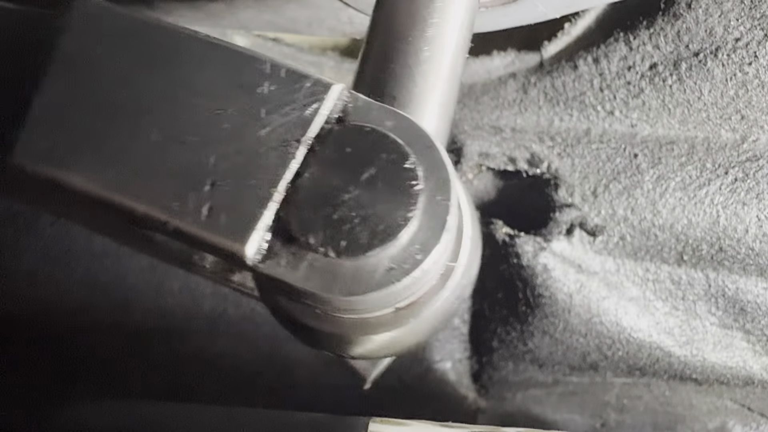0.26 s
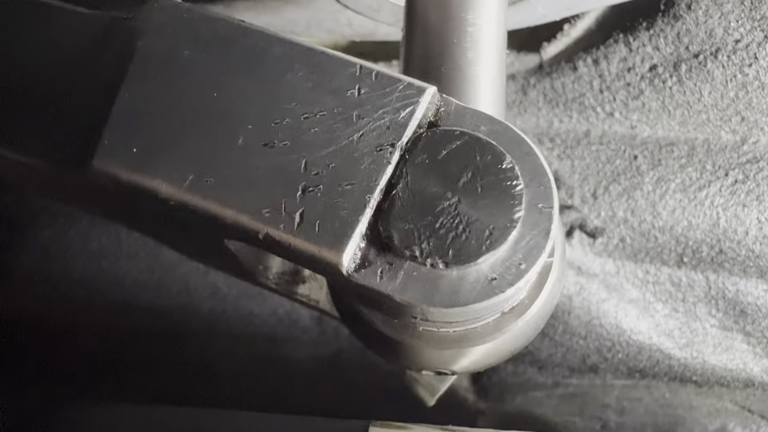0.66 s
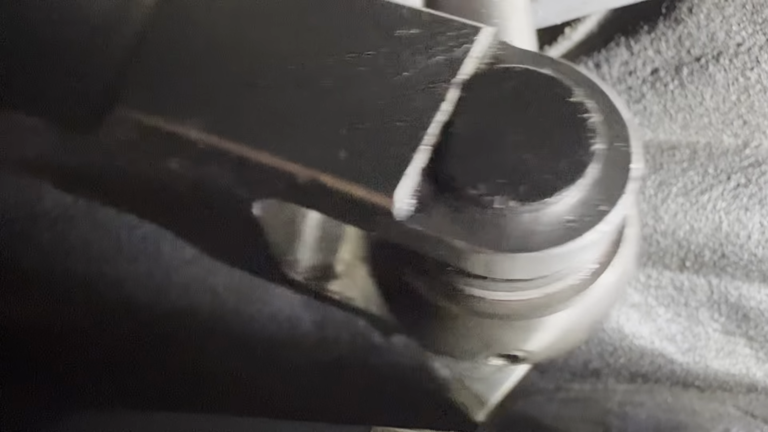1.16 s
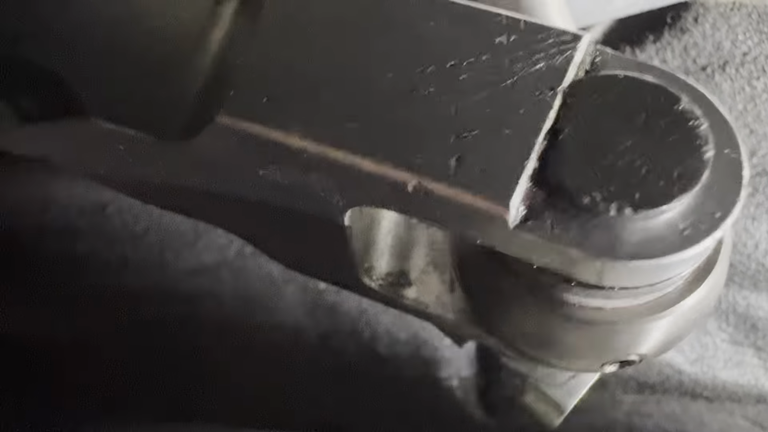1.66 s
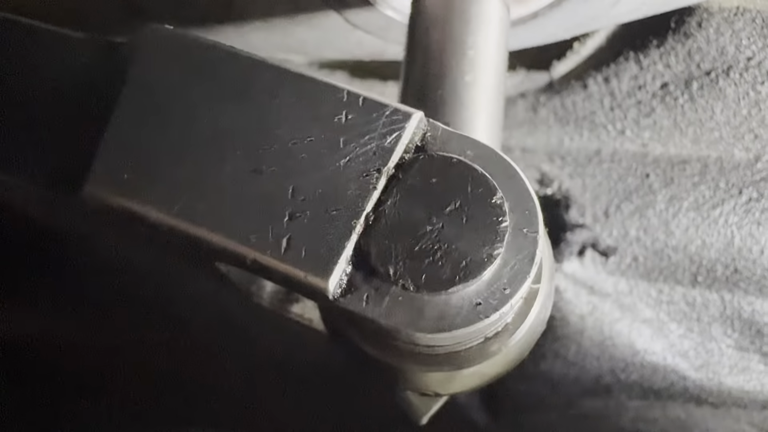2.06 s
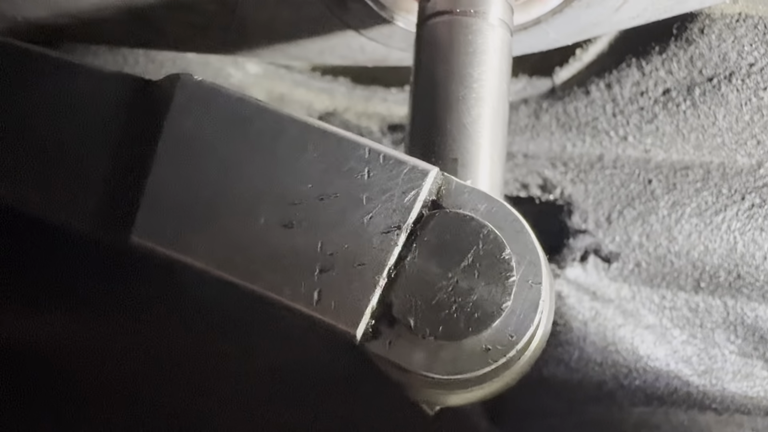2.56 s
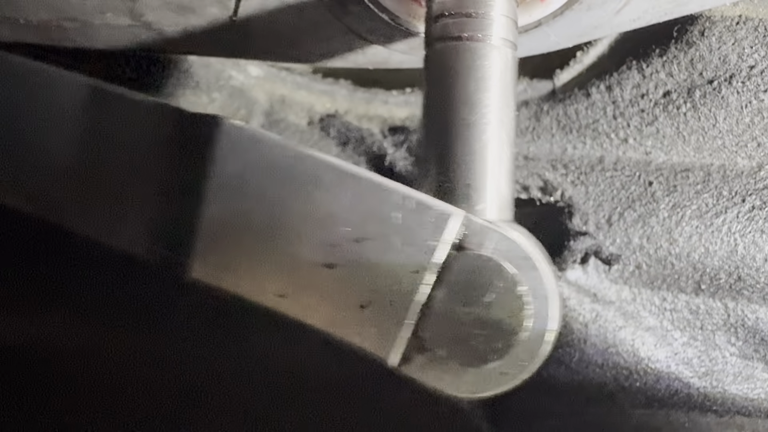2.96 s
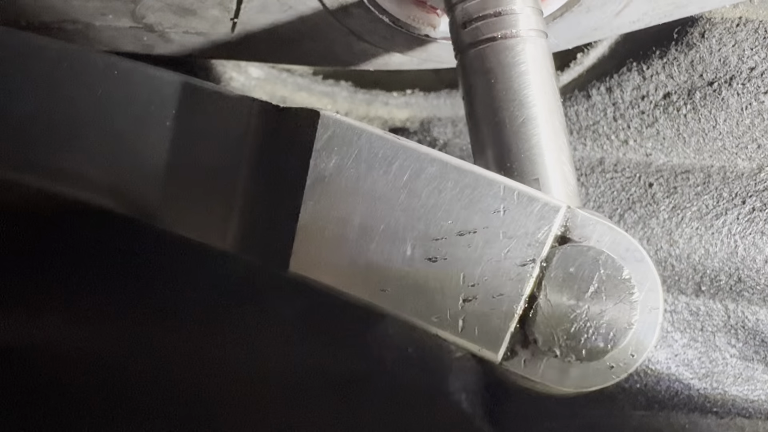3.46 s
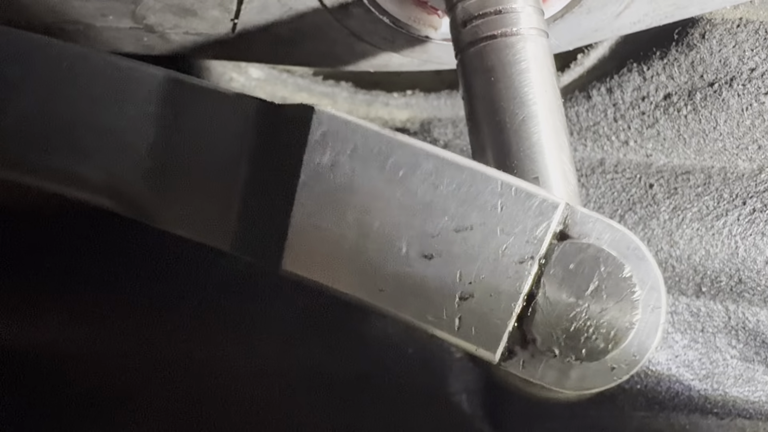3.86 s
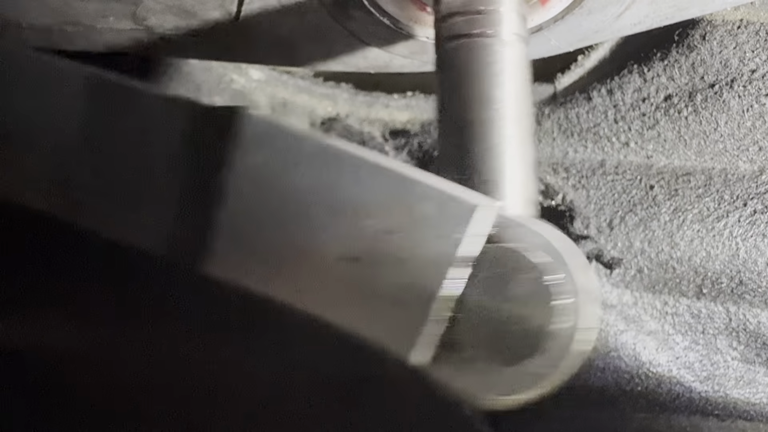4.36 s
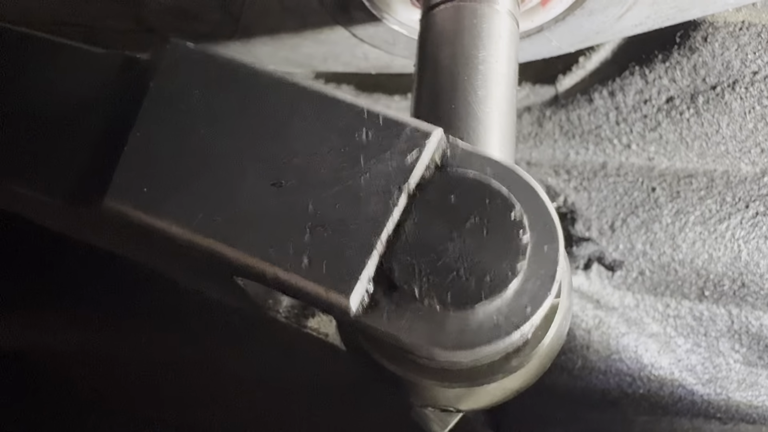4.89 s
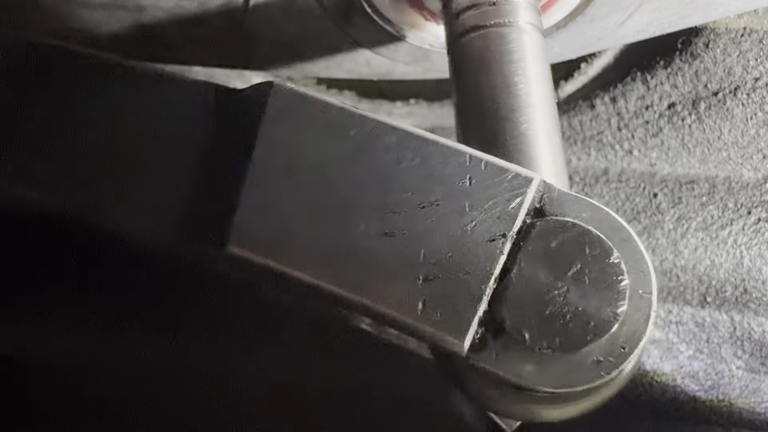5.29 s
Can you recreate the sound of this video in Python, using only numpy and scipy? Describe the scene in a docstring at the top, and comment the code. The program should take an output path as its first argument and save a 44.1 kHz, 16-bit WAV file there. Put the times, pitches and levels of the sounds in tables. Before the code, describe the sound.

A steel gear lever is worked by hand, with the microphone close under a car's floor pan. A low workshop rumble with faint wavering tones runs throughout, slightly stronger at first. The linkage moves in short clusters of metal clicks, hollow clacks and dull housing thuds, sometimes with a tiny scrape.

The first cluster comes at about 0.4 seconds, then a single knock at 0.9 and a rattle from 1.1 to 1.3. A sharp clack lands at 1.8 and a softer clunk at 2.4. The heaviest thuds fall at 2.9 and 3.3 seconds. After a lull with a few faint ticks, a hard clacking clunk arrives at 4.4. More knocks follow at 4.9 and 5.2, the latter leaving the long rod ringing faintly, and a last bright clack comes near 5.5. Each contact has a very short echo between floor and ground.

```python
"""Gear linkage from under the car

A steel gear lever is worked by hand, the microphone close under the floor pan. Joints knock, chatter and slide
as play is taken up, each contact ringing the linkage. The housing thuds, and the hardest blows leave the long
rod ringing faintly; its thin ring at 1460 Hz lingers, stronger at first. Short echoes pass between floor pan
and ground. Further off, a low rumble with a faint hum fills the workshop."""
import sys
import numpy as np
from scipy import signal
from scipy.fft import rfft, irfft
from scipy.io import wavfile

SR = 44100
rng = np.random.default_rng(int(sys.argv[2]) if len(sys.argv) > 2 else 0)


def file_out(sig):
    """Save sig as 16-bit WAV at sys.argv[1]."""
    # one column per channel
    cols = np.atleast_2d(sig).T
    # limit, then scale
    lim = np.clip(cols, -1, 1)
    pcm = np.round(lim * 32767).astype(np.int16)
    wavfile.write(sys.argv[1], SR, pcm)


N = 243860

# Spectrum of the workshop rumble. Each row: frequency in Hz, relative level of the third-octave noise bands in
# dB.
RUMBLE_SPECTRUM = [(30, -23), (50, -1.5), (115, 4), (165, -12.5), (210, -3.5), (320, -13), (500, -21),
                   (960, -29.5), (1650, -44), (3500, -64), (14000, -74.5)]
# Stereo width of the room. Each row: frequency in Hz, side against mid in dB.
ROOM_WIDTH = [(60, -13), (180, -12), (550, 4), (15000, -5)]
# Faint tones in the room. Each row: pitch in Hz, width in Hz, settled rms level in dB.
FAINT_TONES = [(1460, 7.1, -76), (214.6, 14, -51.5), (510, 60, -64)]
# Joints knocking. Each row: start in seconds, clack peak in dB, hardness in dB, hollow note in Hz.
KNOCKS = [(0.293, -56.5, 21.5, 920), (0.329, -56, -83.5, 820), (0.374, -36, 29.5, 516),
          (0.383, -26.5, -17, 1080), (0.398, -26, 22.5, 4870), (0.422, -35.5, 4.5, 670),
          (0.508, -39, -2.5, 1020), (0.542, -42.5, -14.5, 550), (0.852, -37, 9, 813),
          (1.0456, -34.5, -0.5, 744), (1.115, -36.5, -7.5, 510), (1.156, -36, -5, 2450),
          (1.203, -29.5, -9, 845), (1.2141, -29.5, 0, 990), (1.241, -37.5, 5, 607),
          (1.2506, -25, 12.5, 620), (1.6448, -41, 5.5, 626), (1.6965, -32.5, 4, 740),
          (1.78, -41, -27.5, 1070), (1.802, -48.5, -4, 2170), (1.8291, -15.5, 9.5, 1650),
          (1.865, -25.5, 7, 700), (1.91, -41.5, -20, 695), (2.332, -36.5, 0.5, 590), (2.432, -36, -7, 730),
          (2.452, -27.5, 0, 683), (2.482, -42.5, 0.5, 520), (2.907, -29, 2.5, 569), (2.928, -37, 15, 670),
          (2.948, -37.5, -1, 520), (3.297, -34, -29, 790), (3.326, -28, -20.5, 1160),
          (3.3329, -23, -10.5, 1110), (3.369, -36.5, 20, 510), (3.38, -27.5, 7.5, 4130),
          (3.81, -54, -17.5, 570), (4.204, -48.5, -1.5, 700), (4.2404, -40, 5.5, 630),
          (4.352, -35.5, 19, 496), (4.3961, -20.5, 11, 2220), (4.4147, -25.5, 8, 790),
          (4.429, -29, -0.5, 590), (4.5187, -47.5, -15.5, 514), (4.9455, -27, 9, 719),
          (4.999, -41.5, 0, 500), (5.2005, -26.5, -5, 975), (5.2091, -30.5, -4, 1300),
          (5.451, -21, 18, 1010)]
# Linkage resonances. Each row: pitch in Hz, least width in Hz, relative level in dB.
LINKAGE_MODES = [(346, 50, 14), (707, 72, 1.5), (1710, 120, 6), (2070, 220, 4.5), (5300, 300, -12),
                 (7170, 700, -5.5), (11800, 600, -16.5), (15200, 1200, -9.5)]
# A joint's three bands: knock, clack, tick. Each row: lower edge in Hz, upper edge in Hz.
JOINT_BANDS = [(280, 1500), (1500, 5000), (5000, 16500)]
# Balance of those bands. Each row: level against the clack in dB, dB gained per dB of hardness.
BAND_BALANCE = [(-2.5, -0.2435), (0, 0), (-24.5, 0.5426)]
# Where those bands sit. Each entry: left against right in dB.
BAND_PAN_DB = [3.5, 2.5, 4]
# Stereo width of the joints. Each row: frequency in Hz, side against mid in dB.
JOINT_WIDTH = [(60, -17), (250, -9), (600, -1), (2500, -3), (8000, 6), (13000, -2)]
# Housing and floor pan thudding. Each row: start in seconds, peak in dB, pitch of the push in Hz.
THUDS = [(0.331, -23, 780), (0.335, -21.5, 414), (0.385, -20, 980), (0.391, -11.5, 352), (0.857, -20, 425),
         (1.776, -20, 256), (1.8675, -13, 702), (1.871, -15.5, 330), (1.916, -20.5, 327), (2.428, -19, 173),
         (2.457, -21.5, 657), (2.912, -20.5, 612), (3.263, -22, 260), (3.327, -18.5, 1190),
         (3.339, -16.5, 375), (3.812, -32, 396), (4.052, -37.5, 735), (4.325, -24, 290), (4.383, -17, 180),
         (4.409, -17, 627), (4.433, -23.5, 386), (4.4, -21, 681), (4.948, -19, 680), (0.414, -14.5, 110.6),
         (1.107, -18.5, 255), (1.222, -15, 268), (1.244, -15, 345), (1.256, -16, 87), (1.786, -17.5, 109.7),
         (1.841, -18.5, 262), (2.453, -14.5, 158.5), (2.91, -17, 250), (2.924, -12.5, 261),
         (2.938, -5.5, 81), (3.304, -14, 98.2), (3.336, -7, 317), (3.368, -11.5, 224), (3.388, -14, 85),
         (4.397, -16.5, 380), (4.406, -14.5, 162.3), (4.421, -19.5, 87), (5.015, -19, 106),
         (5.124, -18, 144), (5.136, -17.5, 299), (5.197, -17.5, 269), (5.208, -12, 351), (5.222, -20, 400),
         (5.436, -21.5, 298), (5.466, -17.5, 112)]
# Housing and floor pan modes. Each row: pitch in Hz, seconds to die by 60 dB.
PANEL_MODES = [(85, 0.16), (103, 0.2), (150, 0.092), (265, 0.068), (335, 0.025), (395, 0.034), (620, 0.039),
               (775, 0.032), (1190, 0.033)]
# Joints sliding. Each row: start in seconds, length in seconds, clack peak in dB, hardness in dB.
SLIDES = [(1.072, 0.038, -38.5, 14.5), (1.794, 0.094, -41.5, -18.5), (2.418, 0.017, -47.5, -2),
          (3.226, 0.078, -46, -6.5), (4.317, 0.041, -46.5, -15.5), (4.379, 0.021, -20, 20.5),
          (5.094, 0.067, -50, -26.5), (5.161, 0.087, -47, -13), (5.183, 0.017, -33.5, -19),
          (5.425, 0.061, -44.5, 1)]
# The long rod's modes. Each row: pitch in Hz, level against the blow in dB, seconds to die by 60 dB.
ROD_MODES = [(991, -15, 1.5), (1232, -9, .15), (1459, -22, .92), (1664, -10, .3), (2064, 6, .13),
             (2095, -15, .42), (2471, -26, .7), (2821, -15, .3), (3085, -12, .15), (4300, -20, .3),
             (4883, -17, .2)]
# Blows that ring the rod. Each row: start in seconds, level in dB.
ROD_BLOWS = [(3.336, -55), (4.399, -53), (5.212, -39)]


def from_db(db):
    """Gain of a level in dB."""
    return 10 ** (np.asarray(db) / 20)


def rms_one(x):
    """Scaled to rms 1."""
    return x / np.sqrt(np.mean(x ** 2) + 1e-20)


def at_hz(points, hz):
    """A table read on a log-frequency axis."""
    freqs, values = np.array(points).T
    return np.interp(np.log(hz), np.log(freqs), values)


def band(x, low, high, order=4):
    """Band-pass with steep edges."""
    return signal.sosfilt(signal.butter(order, [low, high], "band", fs=SR, output="sos"), x)


def resonance(x, hz, width_hz):
    """One resonance with gain 1 at its peak."""
    r = np.exp(-np.pi * width_hz / SR)
    gain = (1 - r * r) / 2
    return signal.lfilter([gain, 0, -gain], [1, -2 * r * np.cos(2 * np.pi * hz / SR), r * r], x)


def ring(clicks, hz, t60):
    """A unit click sets a sine of height 1 ringing, 60 dB down after t60 seconds."""
    r, w = from_db(-60 / (t60 * SR)), 2 * np.pi * hz / SR
    return signal.lfilter([0, np.sin(w)], [1, -2 * r * np.cos(w), r * r], clicks + 1e-18)


def drift(rate_hz):
    """A random wander of rms 1, mostly slower than rate_hz."""
    hop, run_in = 40, 2000
    r = np.exp(-2 * np.pi * rate_hz * hop / SR)
    white = rng.standard_normal(N // hop + run_in + 2)
    slow = signal.lfilter([1], [1, -2 * r, r * r], white)[run_in:]
    return np.interp(np.arange(N) / hop, np.arange(len(slow)), rms_one(slow))


def add(out, start_s, sound):
    """Mix a stereo sound in at start_s."""
    i = round(start_s * SR)
    out[:, i:i + sound.shape[1]] += sound[:, :N - i]


def left_right(mid, side):
    """Mid and side to left and right."""
    return np.array([mid + side, mid - side])


def settling(settle_s=0.61):
    """Falls from 1 to 0 at the start."""
    return np.exp(-(np.arange(N) / SR / settle_s) ** 2)


def workshop_rumble(level_db, waver_db, start_boost_db):
    """The room all round: wavering third-octave bands of noise, most alike on both sides in the bass."""
    out, edges = 0, 22 * 2 ** (np.arange(30) / 3)
    white = rng.standard_normal((2, 2, N + SR))   # with a second of run-in
    boost_db = start_boost_db * settling()
    for k, (low, high) in enumerate(zip(edges, edges[1:])):
        mid, side = band(white[k % 2], low, high, order=3)[:, SR:]
        hz = np.sqrt(low * high)
        db = at_hz(RUMBLE_SPECTRUM, hz) + waver_db * drift(rate_hz=25) + boost_db * (hz > 200)
        out += from_db(db) * left_right(mid, from_db(at_hz(ROOM_WIDTH, hz)) * side)
    return from_db(level_db) * out / np.std(out.mean(axis=0))


def lingering_tones(start_boost_db):
    """Faint steady tones, stronger at first: the rod's thin lingering ring at 1460 Hz and a low room hum, noise
    through narrow resonances."""
    out, white = 0, rng.standard_normal((2, N + SR))
    for hz, width, db in FAINT_TONES:
        tone = resonance(resonance(white, hz, width), hz, width)
        mid, side = rms_one(tone[:, SR:])
        out += from_db(db) * left_right(mid, from_db(at_hz(ROOM_WIDTH, hz)) * side)
    return from_db(start_boost_db * settling()) * out


def steel_contacts(count, grit_db):
    """Steel on steel: two noises under one uneven train of contact strengths."""
    return rng.standard_normal((2, count)) * from_db(grit_db * rng.standard_normal(count))


def linkage(contacts, scatter_db=3.5, crack_db=-4.5, detune=0.026):
    """Contacts give a broad crack and ring the linkage, its strengths and pitches new each time."""
    body = from_db(crack_db) * signal.lfilter([1], [1, -.8], contacts)
    offsets_db = rng.normal(0, scatter_db, len(LINKAGE_MODES))
    tunings = np.exp(detune * rng.standard_normal(len(LINKAGE_MODES)).clip(-2, 1))
    for (hz, width, db), offset_db, tuning in zip(LINKAGE_MODES, offsets_db, tunings):
        width = max(width, 120 + hz / 25)
        body += from_db(db + offset_db) * resonance(contacts, tuning * hz, width) * np.sqrt(SR / width)
    return body


def disperse(pair, lateness, top_hz):
    """Bending waves: under top_hz the delay grows as 1 / sqrt(Hz), so each blow sweeps downwards."""
    hz = np.minimum(np.fft.rfftfreq(pair.shape[1], 1 / SR), top_hz)
    turns = lateness * (2 * np.sqrt(hz) - hz / np.sqrt(top_hz))
    return irfft(rfft(pair) * np.exp(-2j * np.pi * turns), pair.shape[1])


def spread(pair, path_s=.0003, alike=0.3):
    """Width at the microphone: the side is partly the same sound by another path, partly unrelated."""
    hz = np.fft.rfftfreq(pair.shape[1], 1 / SR) + 1
    other_path = rfft(pair[0]) * np.exp(2j * np.pi * hz * path_s)
    side = alike * other_path + np.sqrt(1 - alike ** 2) * rfft(pair[1])
    side *= from_db(at_hz(JOINT_WIDTH, hz))
    return left_right(pair[0], irfft(side, pair.shape[1]))


def joint(contacts, clack_db, hardness_db, note_hz, rms_samples, hollow_db=20, hollow_q=3.8):
    """Contacts ring the linkage and a hollow note; harder ones move strength from knock to tick."""
    hollow = from_db(hollow_db) * resonance(contacts, note_hz, note_hz / hollow_q) * np.sqrt(SR / note_hz)
    body = disperse(linkage(contacts) + hollow, lateness=.14, top_hz=2000)
    out = 0
    for (low, high), (base_db, slope), pan_db in zip(JOINT_BANDS, BAND_BALANCE, BAND_PAN_DB):
        part = band(body, low, high)
        is_clack = low == JOINT_BANDS[1][0]
        size = np.abs(part[0]).max() if is_clack else np.std(part[0, :rms_samples])
        gain = from_db(clack_db + base_db + slope * hardness_db) / size
        pan = from_db([[pan_db / 2], [-pan_db / 2]])
        out += gain * spread(part) * pan
    return out


def joint_knocks(grit_db, chatter_s, rise_share):
    """Close by, each knock is a dying chatter in a joint, with a hollow note set by where it lands."""
    out, t = np.zeros((2, N)), np.arange(SR // 8) / SR
    fall = from_db(-30 * t / chatter_s)
    fall *= 1 + from_db(0.5) * np.exp(-t / 0.002)   # the first contact stands out
    for start, db, hardness_db, note_hz in KNOCKS:
        softness = from_db(np.clip(-0.14 * hardness_db, -5, 5))   # softer contact rises more slowly
        rise = 1 - np.exp(-t / (rise_share * chatter_s * softness))
        contacts = steel_contacts(len(t), grit_db) * rise * fall
        add(out, start, joint(contacts, db, hardness_db, note_hz, rms_samples=SR // 70))
    return out


def underbody_echoes(x, t60, dull_hz):
    """Dense echoes between floor pan and ground: dying noise, different on each side."""
    t = np.arange(SR // 2) / SR
    envelope = from_db(-60 * t / t60) * np.minimum(t / .006, 1)
    tail = rng.standard_normal((2, len(t))) * envelope
    tail = signal.sosfilt(signal.butter(1, dull_hz, fs=SR, output="sos"), tail)
    tail /= np.sqrt(np.sum(tail ** 2, axis=1, keepdims=True))
    return signal.fftconvolve(x, tail, axes=1)[:, :N]


def housing_thuds(push_cycles, shortest_push_s, pitch_reach):
    """Just overhead, a soft push swings the heavily damped panel modes near its own pitch."""
    out, click = np.zeros((2, N)), signal.unit_impulse(SR // 4)
    modes = np.array([ring(click, hz, t60) + .5 * ring(click, 1.8 * hz, 0.75 * t60)
                      for hz, t60 in PANEL_MODES])
    mode_hz = np.array(PANEL_MODES)[:, 0]
    for start, db, hz in THUDS:
        push_s = max(push_cycles / hz, shortest_push_s)
        turns = np.arange(round(push_s * SR)) * hz / SR
        push = np.hanning(len(turns)) * np.cos(2 * np.pi * (turns - turns.mean()))
        drive = np.exp(-(np.log(mode_hz / hz) / pitch_reach) ** 2)
        swing = np.convolve(drive @ modes, push)[:len(click)]
        swing *= from_db(db) / np.abs(swing).max()
        # the thud reaches one side a little later; higher thuds sound wider
        side = from_db(-12) * hz / 200 * np.roll(swing, round(SR / hz / 4))
        add(out, start, left_right(swing, side))
    return out


def joint_slides(grit_db, slip_db, slip_s, note_hz):
    """As play is taken up, the same joints slide: a swell of fine contacts in uneven slips."""
    out, t = np.zeros((2, N)), np.arange(SR // 8) / SR
    for start, length, db, hardness_db in SLIDES:
        swell = np.sin(np.pi * t / length).clip(0) ** 0.6 * (t < length)
        slips = from_db(slip_db * rng.standard_normal(len(t)))[(t / slip_s).astype(int)]
        contacts = steel_contacts(len(t), grit_db) * swell * slips
        add(out, start, joint(contacts, db, hardness_db, note_hz, rms_samples=round(length * SR)))
    return out


def rod_ringing():
    """The hardest blows leave the long rod ringing in thin tones, a little uneven left and right."""
    out = np.zeros((2, N))
    for hz, db, t60 in ROD_MODES:
        clicks = np.zeros((2, N))
        for start, blow_db in ROD_BLOWS:
            clicks[:, round(start * SR)] = from_db(db + blow_db + rng.normal(0, 1.4, 2))
        out += ring(clicks, hz, t60)
    return out


def scene():
    """Under the car: metal close to the microphone with its echoes, the workshop behind."""
    metal = joint_knocks(grit_db=5.5, chatter_s=0.028, rise_share=0.051)
    metal += joint_slides(grit_db=7, slip_db=2.5, slip_s=.004, note_hz=520)
    metal += housing_thuds(push_cycles=.8, shortest_push_s=.005, pitch_reach=0.21)
    echoes = from_db(-18.5) * underbody_echoes(metal, t60=0.22, dull_hz=6050)
    rod = rod_ringing()
    room = workshop_rumble(level_db=-37, waver_db=1, start_boost_db=3)
    room += lingering_tones(start_boost_db=9.5)
    return metal + echoes + rod + room


def record(dry):
    """The microphone loses the deepest bass and dips near 9 kHz; the top is cut by 17 kHz."""
    dry = signal.sosfilt(signal.butter(4, 50, "high", fs=SR, output="sos"), dry)
    dry = dry - 0.52 * resonance(dry, hz=8920, width_hz=3300)
    return signal.sosfilt(signal.cheby2(20, 60, 17000, fs=SR, output="sos"), dry)


dry = scene()
out = record(dry)
file_out(out)
```